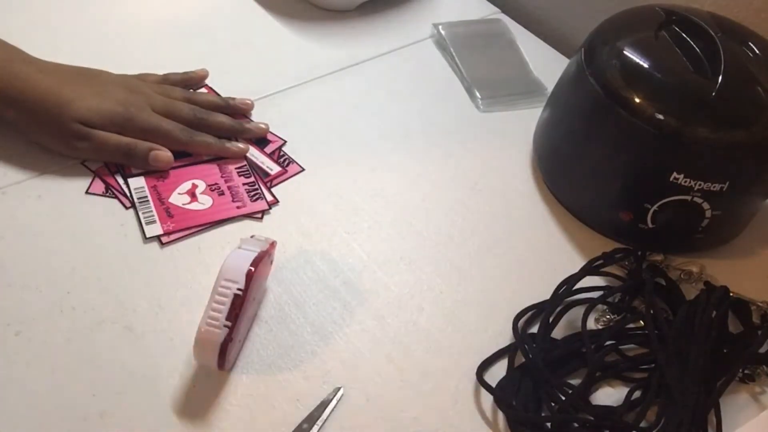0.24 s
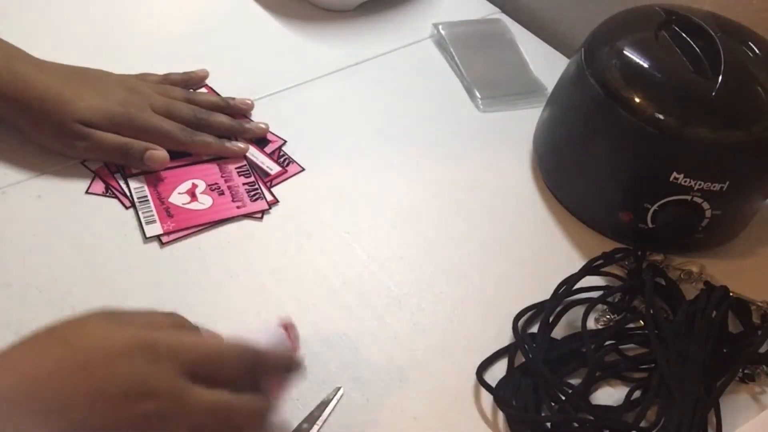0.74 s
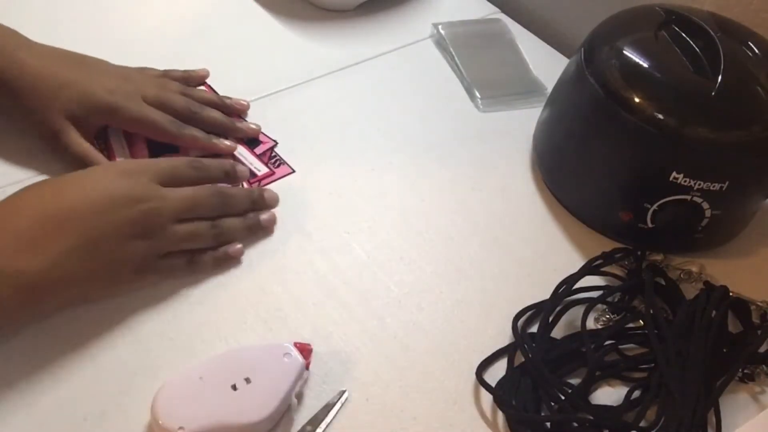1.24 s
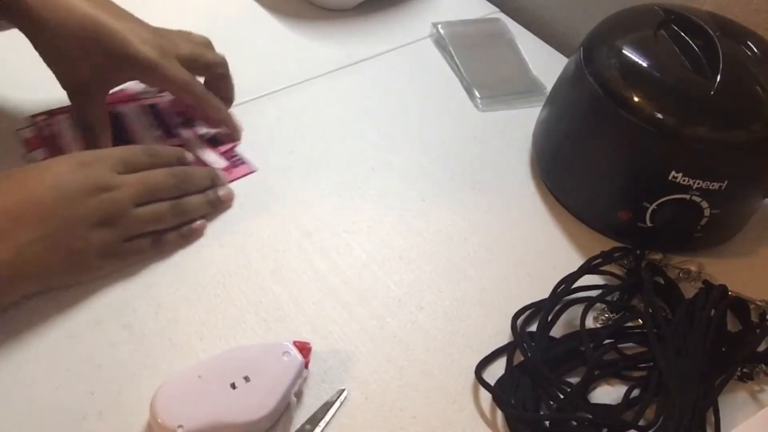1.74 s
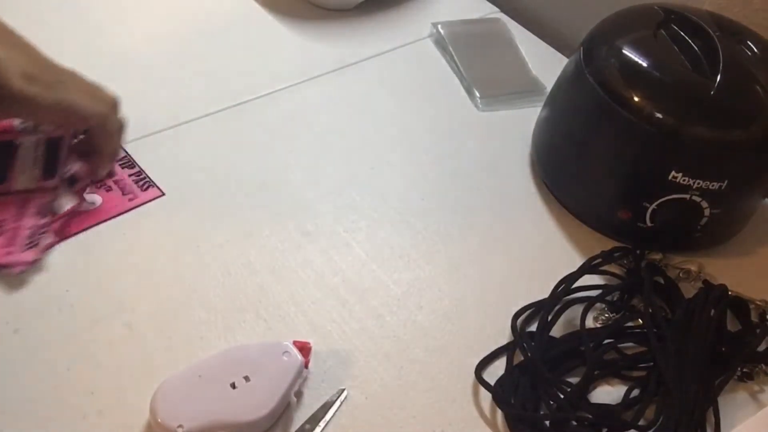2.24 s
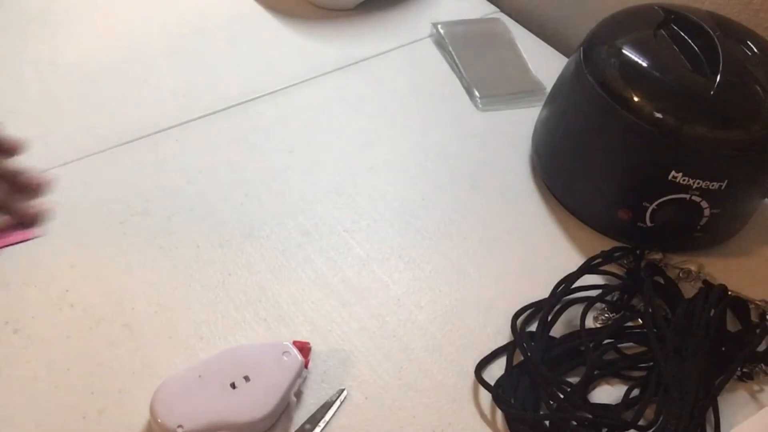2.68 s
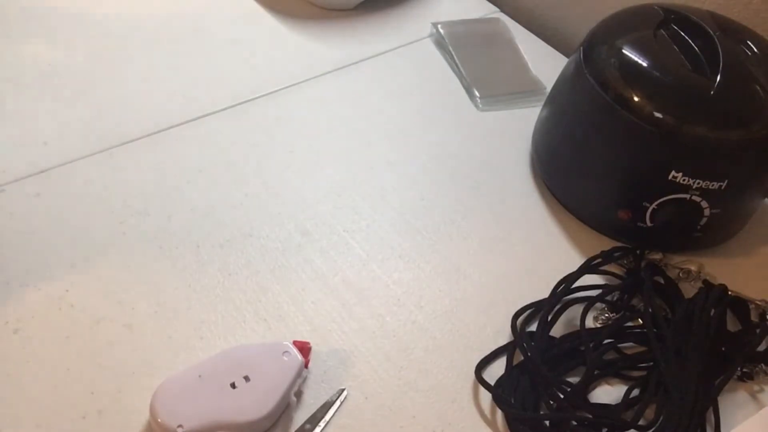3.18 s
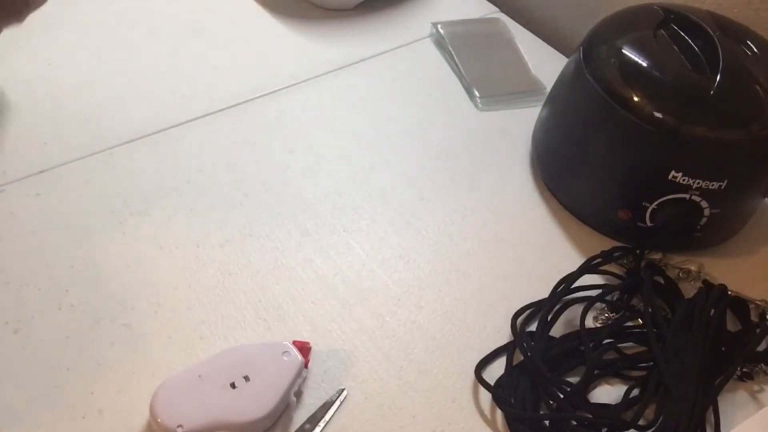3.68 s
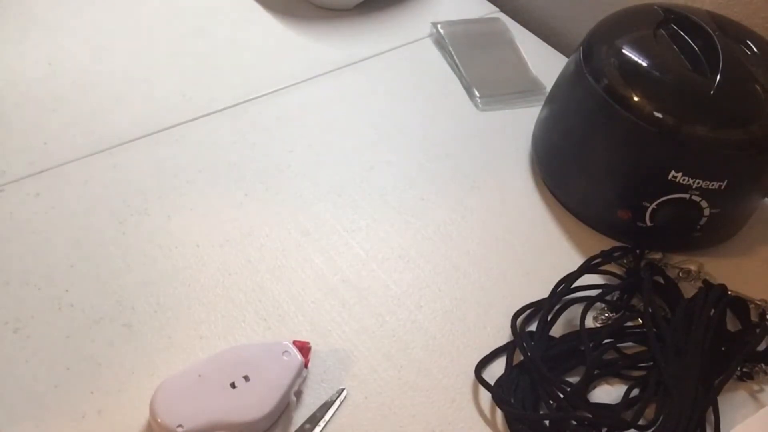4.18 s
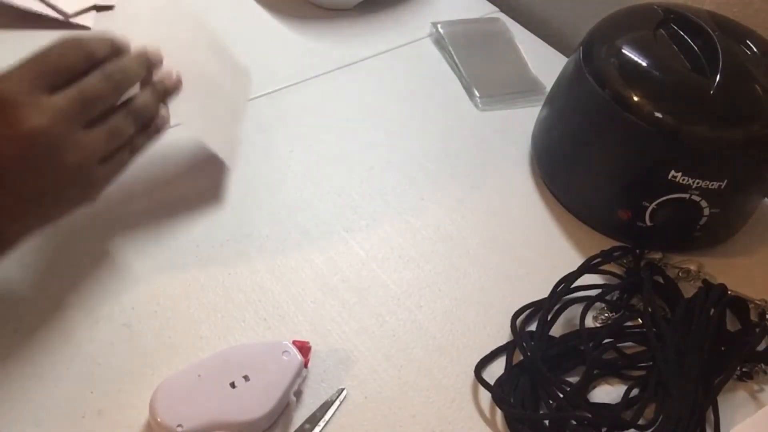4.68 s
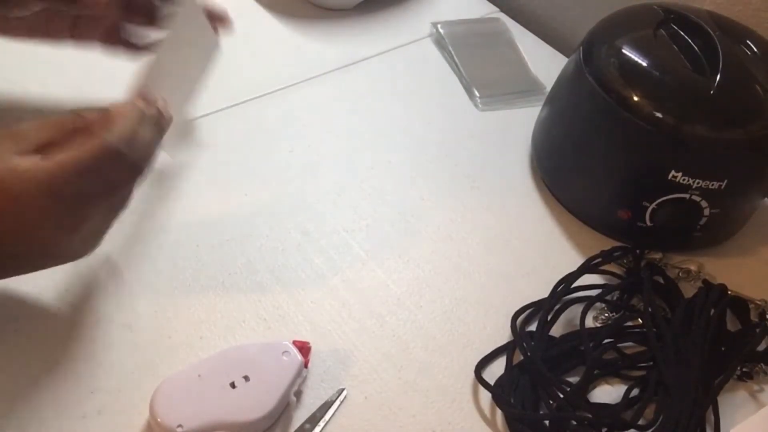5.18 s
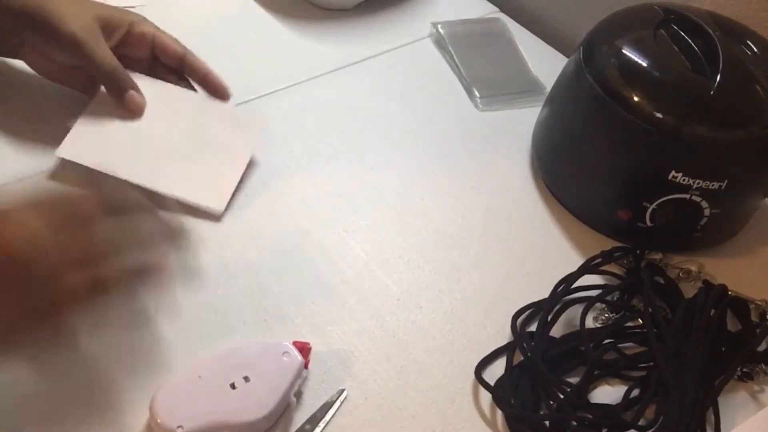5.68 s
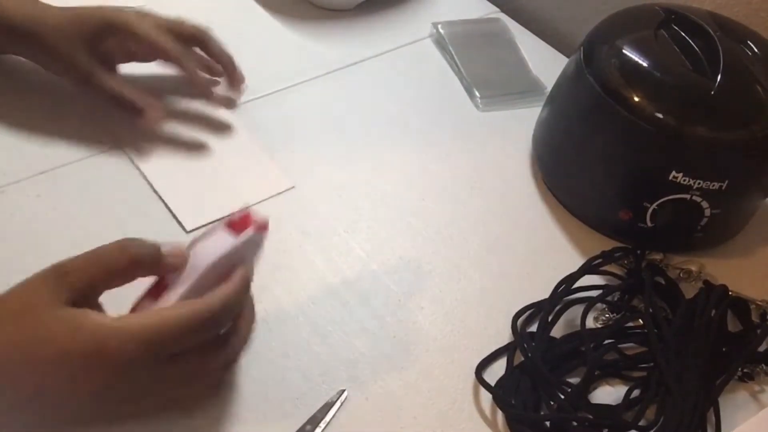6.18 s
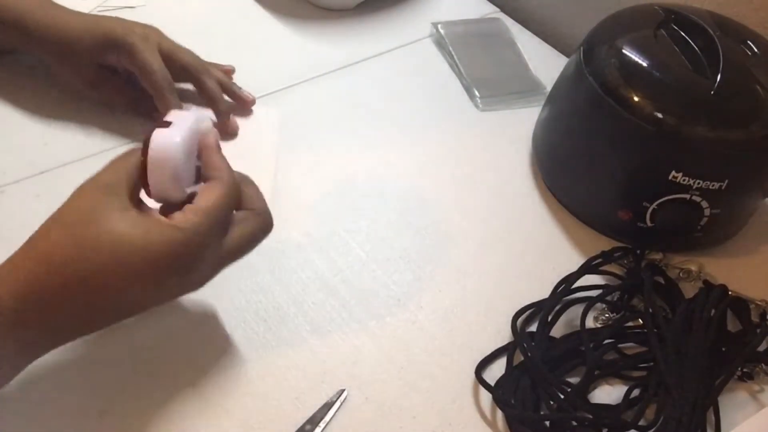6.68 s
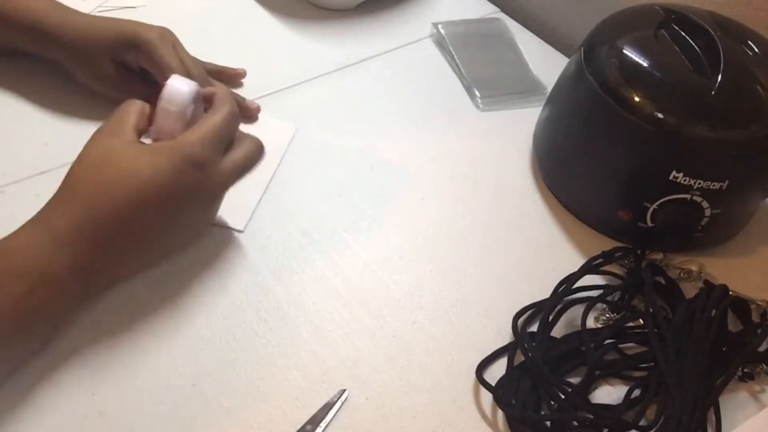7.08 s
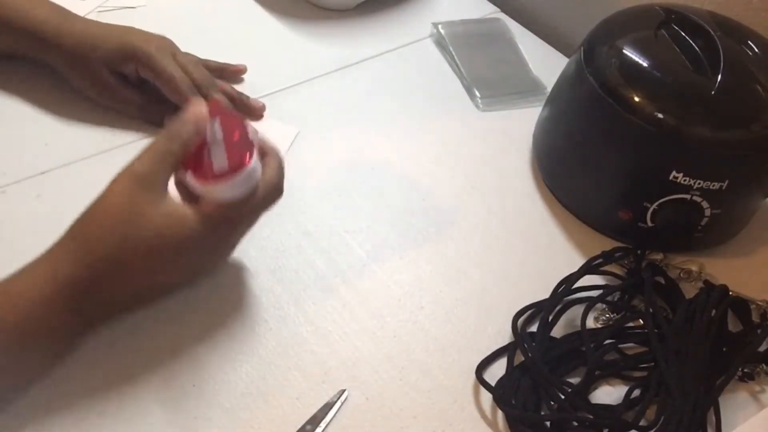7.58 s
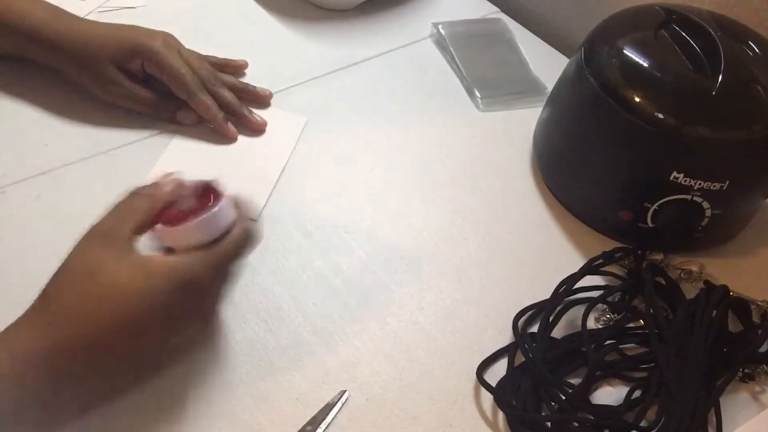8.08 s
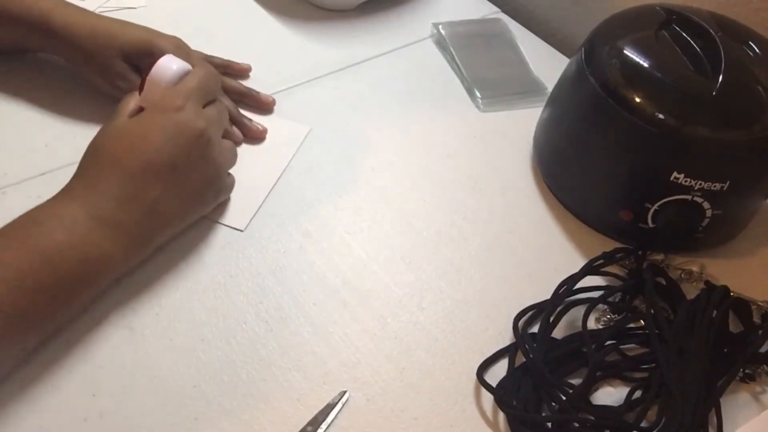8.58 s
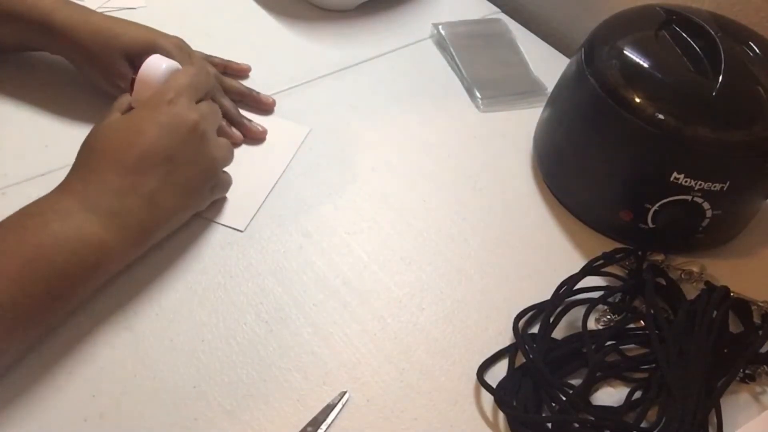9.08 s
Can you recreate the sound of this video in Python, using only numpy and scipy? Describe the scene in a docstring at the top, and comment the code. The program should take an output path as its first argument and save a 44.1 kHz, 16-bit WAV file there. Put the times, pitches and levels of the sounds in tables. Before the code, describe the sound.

Close to the microphone in a small quiet room, a hard plastic tape dispenser clacks loudly on a table and rattles to rest. A stack of cards is shuffled and swept away with papery rustles and small taps. After a sparse lull, a single card slides briskly, the dispenser is handled and set down softly, the card is wiped, and tape releases in tiny ticks that thicken into a rasp. A steady low hum lies beneath.

```python
"""Tape runner and cards on a table

A plastic tape runner is knocked over and rattles to rest; cards are swept away; a card slides and is wiped;
the runner is pressed down and its adhesive tape lets go in ticks that crowd into a rasp. An appliance hums.
Impacts and ticks are noise bursts through resonances; slides are rough friction noise through the same
kind of bodies, with room reverberation; squeaks, thumps and hum are sines; air is shaped noise.
"""
import sys
import numpy as np
from scipy import signal
from scipy.fft import rfft, irfft, next_fast_len
from scipy.io import wavfile
from scipy.ndimage import uniform_filter1d, map_coordinates

SR = 44100
rng = np.random.default_rng(int(sys.argv[2]) if len(sys.argv) > 2 else 0)


def dump(signal):
    """Clip the signal to [-1, 1] and save it as 16-bit WAV at the path in sys.argv[1]."""
    limited = np.clip(np.atleast_2d(signal).T, -1, 1)
    pcm = np.round(limited * 32767).astype(np.int16)
    wavfile.write(sys.argv[1], SR, pcm)


N = 411894

# table top resonances: center_hz, width_hz, gain_db
TABLE_MODES = [(240, 38, -3), (331, 39, 4), (378, 71, 2), (451, 120, -1), (595, 140, -4.5), (935, 260, -6),
               (191, 84, -7)]
# treble response of a hard or fine contact: freq_hz, gain_db
CONTACT_HISS = [(3000, -31), (6000, -3.5), (8000, -9.5), (11000, -13), (16000, -14)]
# spool resonances: center_hz, width_hz, gain_db
SPOOL_MODES = [(1160, 350, 2.5), (2010, 160, -20), (2540, 180, -8), (3270, 550, 0), (4100, 480, 0),
               (5700, 670, -2), (6300, 1200, -10)]
# adhesive releases: start_s, low_ring_peak_db, low_ring_hz, high_rings_re_low_db, film_re_low_db
TAPE_TICKS = [(8.355, -55, 1280, -8, -14), (8.39, -56, 1280, -6, -12), (8.429, -51, 1280, -6, -10),
              (8.467, -49, 1250, -4, -9), (8.492, -50.5, 1650, -1, -13), (8.499, -48, 1280, -5, -14),
              (8.545, -63, 980, 0, 5), (8.581, -51, 1340, 0, -6), (8.616, -47, 1240, -11, -17),
              (8.682, -46.5, 1250, -3, -10), (8.791, -49.5, 1950, -9, -18), (8.835, -48.5, 1240, -5, -8),
              (8.93, -51, 1260, -2, -12), (8.957, -48, 1190, -8, -15), (8.968, -45, 2080, -2.5, -6),
              (8.98, -44, 1320, -3, -8), (8.999, -41, 1900, -10, -13), (9.022, -41, 1910, -11, -13),
              (9.035, -44, 1890, -4, -4), (9.045, -34, 1840, -8, -5.5), (9.11, -44, 1850, -1, -18),
              (9.126, -43, 1890, -5, -16), (9.145, -47, 1300, 6, -16), (9.168, -33.5, 2000, 2, -7),
              (9.2, -39.5, 2110, -7, -16), (9.217, -45, 1830, -3, -11), (9.231, -40, 2160, 2, -11),
              (9.24, -43, 1940, 2, -9), (9.248, -36.5, 1860, 1, -9), (9.256, -41.5, 1810, 5, -9),
              (9.27, -49, 1830, 13, 3), (9.283, -48, 1277, 12, 0), (9.299, -47, 1270, 14, 4),
              (9.311, -45, 1290, 10, -2), (9.324, -47, 1900, 8, 4)]


def taps():
    """Each tap rings the shell, strongest at two tones set by the struck spot, and the table; an edge cracks."""
    # shell resonances: center_hz, width_hz, gain_db
    shell_modes = [(1017, 67, -12), (1235, 480, 0), (1410, 230, 9.5), (1510, 16, -9), (1610, 400, 2.5),
                   (2230, 1400, -8.5), (2450, 150, -10), (2840, 120, -5.5), (3540, 1000, 2.5),
                   (4000, 210, -47), (5470, 900, -7)]
    # knocks: start_s, shell_peak_db, low_ring_hz, high_ring_hz, low_ring_gain_db, high_ring_gain_db,
    # table_re_shell_db, edge_re_shell_db, shell_tail_db
    tap_rows = [(0.229, -28.5, 1700, 4370, 15, 24, -21, -19, -15),
                (0.254, -28, 1750, 6040, 4, 15, -28, -24, -19),
                (0.263, -32, 1770, 4300, 17, 23, -31, -24, -16),
                (0.325, -38, 1170, 4600, 9, 26, -21, -27, -18),
                (0.443, -44.5, 1410, 3130, 7, 21, -6, -27, 3),
                (0.479, -33, 1420, 2170, 10, -6, -4, -22, -15),
                (0.497, -42, 1540, 2950, 4, 4, -7, -27, -22),
                (0.641, -37.5, 1220, 2440, -1, -2, -25, -26.5, -6),
                (0.716, -5.5, 1410, 2440, 5.5, 4, -12.5, -27, -19),
                (0.72, -16, 1530, 3230, -6, 6, -20, -27, -16),
                (0.726, -25, 1570, 1970, 9, -6, -13, -26.5, -9),
                (0.733, -15.5, 1410, 2120, -8, -16, -14, -26.5, -15),
                (0.851, -23.5, 1130, 1900, 12, 6, 2.5, -25.5, -15),
                (0.867, -35.5, 1120, 1940, 14, -3, -20, -26, -4),
                (0.939, -31, 1400, 2300, 18, 10, 3, -27, -15),
                (0.988, -30, 1110, 1960, 6, 5, -3.5, -21, -23),
                (1.087, -49.5, 1640, 2050, 9, 4, -15, -27, 1), (1.193, -48.5, 956, 2370, 9, 2, 0, -27, -17),
                (1.358, -31, 880, 2030, 13.5, 5.5, 0.5, -33, -6),
                (1.517, -45, 1560, 2180, 2, -2, -5, -27.5, -8),
                (1.592, -38.5, 1020, 2120, 1, 17, -12, -27, -6),
                (1.64, -28, 1220, 3100, 9, 7.5, -3, -27, -7.5),
                (1.798, -30, 1560, 2830, -5, 4, -23, -26.5, -3),
                (2.088, -39.5, 790, 2110, 9, 2, 0, -27, -6),
                (2.135, -43.5, 1130, 2110, 16, 2, -13, -26.5, -4),
                (2.45, -35.5, 1070, 3020, 12, 23, -8.5, -25, -4),
                (2.732, -36.5, 1140, 1960, 14, -4, -3, -27, -9),
                (2.953, -32.5, 1500, 2560, 5, 8, -8.5, -28, -16),
                (3.095, -43, 960, 2070, 18, -9, -17, -27, -13),
                (3.237, -47, 1460, 2650, 7, 6, -16, -27, -22),
                (3.242, -33, 1330, 3820, 5.5, 15, -17, -24.5, -22),
                (3.451, -46.5, 1420, 2900, 10, 6, -12.5, -27.5, -16),
                (4.194, -27, 1200, 1990, 11, 4, -18, -27, -12),
                (4.518, -49, 1230, 4560, 9, 2, -8, -28, -11),
                (4.602, -47.5, 1010, 2250, 7, 5, -12, -27, -14),
                (5.273, -47, 888, 2460, 9.5, 5.5, 9.5, -27, -13),
                (5.462, -34, 1620, 2880, 9, 2, -16, -26.5, -10),
                (5.765, -36, 920, 3070, 4, 2, -2.5, -27.5, -12),
                (5.808, -48, 1220, 2410, 9, 11, -16, -27.5, -11),
                (5.893, -44, 1690, 3240, 9, -5, -10, -27, -10),
                (5.906, -38, 1330, 2430, 16, -9, -10, -29, -15),
                (6.079, -41.5, 1330, 2810, 9, -4, -2, -27, -2),
                (6.222, -46.5, 904, 2000, 19, -5.5, 9, -27, -11),
                (6.402, -51, 1620, 2620, 12, 0, -12, -25.5, -12.5),
                (7.044, -47, 1120, 1920, 12, -0.5, -12, -27, -12.5),
                (7.196, -45, 912, 2060, 8, 7, -16, -26, -19),
                (7.654, -39.5, 1850, 3170, 15.5, 11, -15, -27.5, -16),
                (7.867, -46, 880, 3150, 9, 4, -3, -27, -18), (8.021, -30, 880, 3450, 12, 4, -2, -27, -13)]
    t60_s, rise_s = 0.012, 0.0005
    track = np.zeros(N + SR)
    for start_s, db, low_hz, high_hz, low_db, high_db, table_db, edge_db, tail_db in tap_rows:
        spot = modes([(low_hz, 0.17 * low_hz, low_db), (high_hz, 0.22 * high_hz, high_db)])
        # a yielding contact cannot drive the top
        soft = lambda hz: 1 / (1 + 1j * hz / (1.59 * high_hz)) ** 2
        shell_response = lambda hz: (modes(shell_modes)(hz) + spot(hz)) * soft(hz)
        table_response = lambda hz: modes(TABLE_MODES)(hz) * soft(hz)
        shell = burst(t60_s, shell_response, rise_s, tail_db, tail_t60_s=0.16)
        table = burst(2.6 * t60_s, table_response, rise_s, tail_db=-11.0, tail_t60_s=0.23)
        crack = burst(0.87 * t60_s, hiss_response, rise_s, tail_db=-9, tail_t60_s=0.12)
        add(track, start_s, amp(db) * (shell + amp(table_db) * table + amp(edge_db) * crack))
    return track[:N]


def ticks():
    """Each adhesive release snaps the spool housing at a low tone and two high rings, and the film."""
    # tape film resonances: center_hz, width_hz, gain_db
    film_modes = [(6300, 1300, 12), (11060, 4000, -2.5)]
    # high rings of the spool housing, response squared below: center_hz, width_hz, gain_db
    housing_modes = [(3450, 520, 1), (4250, 860, -1.5)]
    t60_s = 0.011
    track = np.zeros(N + SR)
    for start_s, db, low_hz, high_db, film_db in TAPE_TICKS:
        low_response = lambda hz: modes([(low_hz, 0.28 * low_hz, 0)])(hz) ** 2
        high_response = lambda hz: modes(housing_modes)(hz) ** 2
        low = burst(t60_s, low_response, 0.00012, tail_db=-21, tail_t60_s=0.09)
        high = burst(t60_s, high_response, 0.00028, tail_db=-15, tail_t60_s=0.05)
        snap = burst(0.0045, modes(SPOOL_MODES), 0.0001, tail_db=-27.5, tail_t60_s=0.05)
        film = burst(t60_s, modes(film_modes), 0.00029, tail_db=-11, tail_t60_s=0.13)
        tick = low + amp(high_db) * high + amp(film_db) * film + amp(-3.5) * snap
        add(track, start_s, amp(db) * tick)
    return track[:N]


def thumps():
    """Dull blows of a hand or the shell into the table: a low sine swells over about a cycle and decays."""
    # blows: start_s, level_db (before decay and a 1 dB lift), pitch_hz, t60_s
    thump_rows = [(0.447, -19.5, 97, 0.13), (0.723, -20, 110.2, 0.11), (0.869, -20, 106, 0.072),
                  (1.811, -27.5, 284.5, 0.26), (2.46, -27, 74.5, 0.23)]
    track, t = np.zeros(N + SR), np.arange(SR // 3) / SR
    for start_s, db, hz, t60_s in thump_rows:
        decay = amp(db + 1 - 60 * t / t60_s)
        onset = (1 - np.exp(-t * hz * 1.5)) ** 2
        add(track, start_s, decay * onset * np.sin(2 * np.pi * hz * t))
    return track[:N]


def slides():
    """Cards are swept off, one slides, the runner is lifted, the card wiped, the runner seated and drawn."""
    # bodies a slide excites: center_hz, width_hz, gain_db
    stack_modes, card_modes, edge_modes = [(1460, 670, -2), (2410, 930, 3), (3110, 1540, 1),
                                           (4450, 1100, -2), (6020, 2100, -16)], [(612, 20, 3), (940, 340, -10.5),
                                                          (1650, 550, -5.5), (2440, 106, 2.5),
                                                          (2830, 74, 5), (3320, 160, 0), (3730, 300, -3),
                                                          (4500, 460, -3), (5270, 280, -6.5),
                                                          (6860, 290, -9)], [(1220, 250, -2), (1700, 440, -3.5),
                                                                        (2305, 460, -4), (3180, 255, 3.5),
                                                                        (4260, 760, -6.5), (5600, 380, -5)]
    rim_modes, nose_modes = [(1460, 450, 5), (2080, 350, 6.5), (2780, 1100, 3), (4290, 810, 2.5),
                             (5460, 880, -6)], [(2180, 250, -3), (2600, 310, -3), (4160, 350, -7.5),
                                          (5050, 570, -14)]
    # strokes: full_s, rise_s, hold_s, fall_s, scrape_db, table_drone_db, fine_hiss_db
    sweep_strokes, card_strokes, lift_strokes = [(.01, 0.012, 0.053, 0.6, -66, -68.5, -84),
                                                 (.475, .04, 0.018, .06, -56.5, -60.5, -74.5),
                                                 (.6, .2, .08, 0.046, -75, -72, -87),
                                                 (.705, .005, .01, 0.21, -49, -51, -74),
                                                 (.84, 0.06, 0.026, 0.054, -51, -44.5, -75.5),
                                                 (.935, .03, .015, .08, -57.5, -48.5, -78),
                                                 (1.05, .15, 0.29, 1, -65, -63.5, -82),
                                                 (1.6, 0.14, 0.02, .05, -52, -54, -74),
                                                 (1.67, .06, 0.13, 0.038, -53, -47.5, -69.5),
                                                 (1.826, 0.055, 0.012, 0.23, -41, -35.5, -68),
                                                 (2.0, 0.17, 0.15, 0.56, -58, -57.5, -70.5),
                                                 (2.368, .025, 0.017, 0.032, -56.5, -80, -60.5),
                                                 (2.495, 0.048, 0.24, 0.098, -48, -53.5, -60.5),
                                                 (2.86, 0.017, 0.14, 0.051, -57.5, -61, -72),
                                                 (3.016, .01, .008, .04, -51, -57, -60),
                                                 (3.045, .03, 0.018, .05, -54, -63, -58.5),
                                                 (3.095, 0.021, 0.039, .02, -50.5, -57, -62.5),
                                                 (3.24, 0.0104, 0.0037, 0.024, -42, -52.5, -64.5),
                                                 (3.345, 0.079, 0.0065, 0.084, -61.5, -68.5, -61),
                                                 (3.458, 0.062, 0.0087, 0.16, -60, -62.5, -72.5),
                                                 (3.65, 0.11, 0.014, 0.1, -55.5, -67, -61.5),
                                                 (3.78, 0.11, 0.02, 0.039, -60, -72, -60),
                                                 (3.95, 0.19, 0.042, 0.032, -60, -72, -65.5),
                                                 (4.066, 0.077, .005, .03, -57.5, -67, -63.5),
                                                 (4.12, 0.046, 0.084, 0.22, -59.5, -73, -62),
                                                 (4.198, 0.0068, .005, 0.048, -55, -41.5, -82),
                                                 (4.3, .08, 0.21, .05, -67, -72, -78.5),
                                                 (4.518, 0.0087, .005, 0.27, -56.5, -56.5, -68),
                                                 (4.738, 0.14, 0.0046, 0.03, -53, -63, -62),
                                                 (5.014, 0.03, 0.19, .06, -65, -72, -74.5)], [(5.38, 0.15, 0.072, 0.034, -43.5, -64, -55.5),
                                                                (5.474, 0.077, 0.026, 0.09, -35.5, -43.5, -49.5),
                                                                (5.66, 0.042, 0.044, .08, -69, -79, -79),
                                                                (5.79, 0.037, 0.044, 0.11, -73, -63, -79),
                                                                (5.91, 0.21, .01, 0.1, -58, -68, -71)], [(5.962, .04, 0.12, .05, -57.5, -65.5, -70.5),
                                                                               (6.092, 0.031, 0.0072, 0.053, -49.5, -44.5, -88),
                                                                               (6.342, 0.12, .03, .1, -73.5, -67, -85),
                                                                               (6.45, 0.15, 0.22, .15, -61, -66, -73),
                                                                               (7.028, 0.25, 0.043, .12, -64, -71, -80),
                                                                               (7.198, 0.027, 0.0042, .01, -77.5, -64, -80),
                                                                               (7.324, .065, .01, .08, -64.5, -68, -81),
                                                                               (7.436, .05, .005, .04, -66.5, -67, -90.5)]
    wipe_strokes, seat_strokes, peel_strokes = [(7.66, 0.14, 0.069, 0.034, -47.5, -57, -59),
                                                (7.87, 0.15, 0.025, 0.14, -45.5, -49, -56.5),
                                                (8.012, 0.03, 0.061, 0.063, -49.5, -53, -61.5)], [(8.35, 0.022, 0.041, 0.084, -55.5, -84.5, -88),
                                                              (8.468, 0.0084, 0.0044, 0.011, -62, -75, -82.5)], [(9.018, .07, .12, .1, -54.5, -70, -76.5),
                                                                            (9.2, 0.094, .06, 0.11, -53.5, -72, -65.5),
                                                                            (9.33, 0.2, .02, .05, -57, -65, -50)]
    swept = slide(sweep_strokes, stack_modes, clump_db=1.64, catch_db=0.72)
    card = slide(card_strokes, card_modes, clump_db=1.0, catch_db=0.0)
    lifted = slide(lift_strokes, rim_modes, clump_db=2.5, catch_db=-0.5)
    seated = slide(seat_strokes, nose_modes, clump_db=0.0, catch_db=2.5)
    tape = slide(peel_strokes, SPOOL_MODES, clump_db=2.0, catch_db=1.1, grip=jerks())
    wiped = slide(wipe_strokes, edge_modes, clump_db=1.0, catch_db=-1.45)
    return swept + card + lifted + seated + wiped + tape


def slide(strokes, body, clump_db, catch_db, grip=1):
    """One friction force rings the sliding thing, the table and the air at the contact."""
    gains = sum(np.outer(amp(row[4:]), swell(*row[:4])) for row in strokes)
    scrape_gain, drone_gain, hiss_gain = map(smooth, gains)
    force = grit(clump_db, catch_db)
    scrape = scrape_gain * unit(filtered(force, modes(body)))
    drone = drone_gain * unit(filtered(force, modes(TABLE_MODES)))
    hiss = hiss_gain * unit(filtered(force, hiss_response))
    return grip * (scrape + drone + hiss)


def grit(clump_db, catch_db):
    """Friction force: noise with patchy shifting colour, random clumps and sparse catches (dips if negative)."""
    patchy_db = 2
    z = signal.stft(rng.standard_normal(N), nperseg=256)[2]
    patches = uniform_filter1d(rng.standard_normal(z.shape), size=4, axis=0)
    patches = uniform_filter1d(patches, size=9, axis=1)
    noise = np.resize(signal.istft(z * amp(patchy_db * unit(patches)), nperseg=256)[1], N)
    catches = amp(catch_db * rng.exponential(size=N // 40)).repeat(40)  # steps of 40 samples
    return unit(noise * amp(clump_db * wobble(60)) * np.resize(catches, N))


def jerks(steady=0.42, slip_s=0.0062):
    """Tape runs out in a short rush after each release and only creeps between; gain is 0 before 8.8 s."""
    t = np.arange(N)[:, None][round(8.8 * SR):] / SR
    since_s = t - np.transpose(TAPE_TICKS)[0]
    rush = np.where(since_s > 0, np.exp(-np.abs(since_s) / slip_s), 0).max(axis=1)
    return np.pad(steady + 2.0 * rush, (N - len(rush), 0))


def squeaks():
    """Thin airy tones where an edge drags: a sine on a gliding pitch, fluttered by fast chance."""
    # squeaks: full_s, rise_s, hold_s, fall_s, pitch_hz (at full_s), glide_hz_per_s, level_db (rms before flutter)
    squeak_rows = [(.84, .015, .035, .015, 3150, 6, -50.5), (1.33, 0.06, .015, 0.061, 3220, 603, -60),
                   (2.83, 0.027, 0.027, .02, 1480, 2000, -64), (3.5, .035, 0.12, .22, 1123, 902, -67),
                   (5.968, .03, .1, 0.31, 2100, -300, -62)]
    t = np.arange(N) / SR
    total = np.zeros(N)
    for full_s, rise_s, hold_s, fall_s, hz, glide, db in squeak_rows:
        gain = amp(db) * np.sqrt(2) * smooth(swell(full_s, rise_s, hold_s, fall_s))
        flutter = 0.65 + 0.83 * wobble(300)
        cycles = (hz + glide * (t - full_s) / 2) * (t - full_s)
        total += gain * flutter * np.sin(2 * np.pi * cycles)
    return total


def room(x):
    """Reverberation by a noise tail; each frequency dies at its own speed."""
    # room decay: freq_hz, t60_s
    room_t60 = [(200, 0.22), (1500, 0.27), (5000, 0.35), (14000, 0.19)]
    hz, t, z = signal.stft(rng.standard_normal(SR // 2), SR, nperseg=256)
    decay = amp(-60 * t / along(room_t60, hz)[:, None])
    tail = signal.istft(z * decay, SR, nperseg=256)[1]
    return signal.fftconvolve(np.pad(x, (200, 0)), tail / np.linalg.norm(tail))[:N]  # 200-sample delay


def background():
    """Wavering appliance tones over broad room and appliance noise."""
    # appliance tones: pitch_hz, level_db (rms before wavering), waver_db
    hum_tones = [(58.8, -62, 4), (119.9, -39.5, 0.45), (232.6, -70, 1), (472, -68, 0.7)]
    # noise spectrum before scaling to -48.5 dB rms: freq_hz, gain_db
    air_spectrum = [(12, -30), (30, -11), (60, 0), (90, -3), (125, -4), (150, -16.5), (190, -24),
                    (260, -20.5), (450, -27.5), (620, -33.5), (1500, -38), (3500, -45), (7000, -50),
                    (9000, -57.5), (16000, -59)]
    t = np.arange(N) / SR
    tones = np.zeros(N)
    for hz, db, waver_db in hum_tones:
        tones += np.sqrt(2) * amp(db + waver_db * wobble(3.6)) * np.sin(2 * np.pi * hz * t)
    air = filtered(rng.standard_normal(N), lambda hz: amp(along(air_spectrum, hz)))
    return tones + amp(-48.5) * unit(air)


def burst(t60_s, response, rise_s, tail_db, tail_t60_s):
    """A sharp blow and dying noise through a body, peak 1; the walls return a second, longer tail."""
    blow_db = 11.5  # one-sample contact, over the noise
    t = np.arange(SR // 3) / SR
    decay = amp(-60 * t / t60_s) + amp(tail_db - 60 * t / tail_t60_s)
    shape = (1 - np.exp(-t / rise_s)) ** 2 * decay
    blow = amp(blow_db) * (np.arange(len(t)) == round(rise_s * SR))
    x = filtered(rng.standard_normal(len(t)) * shape + blow, response)
    return x / np.abs(x).max()


def modes(table):
    """Causal response of center_hz, width_hz, gain_db resonances, alternating in sign."""
    return lambda f: sum((-1) ** k * amp(db) * 1j * f * w / (c * c - f * f + 1j * f * w)
                         for k, (c, w, db) in enumerate(table))


def hiss_response(hz):
    """Treble gain of a hard or fine contact."""
    return amp(along(CONTACT_HISS, hz))


def swell(full_s, rise_s, hold_s, fall_s):
    """Gain of one gesture, a value per 44 samples: rises, holds, falls."""
    fade_db = 25  # below full level one rise before, or one fall after
    t = np.arange(N // 44 + 2) * 44 / SR - full_s
    away = np.maximum(-t / abs(rise_s), (t - abs(hold_s)) / abs(fall_s))
    return amp(-fade_db * np.maximum(0, away))


def smooth(x):
    """From a value per 44 samples to one per sample."""
    return np.interp(np.arange(N) / 44, np.arange(len(x)), x)


def wobble(rate_hz):
    """Smooth random curve, rate_hz knots a second."""
    knots = rng.standard_normal(int(N * rate_hz / SR) + 4)
    return map_coordinates(knots, [np.arange(N) * rate_hz / SR])


def filtered(x, response):
    """x through a complex response of frequency."""
    m = next_fast_len(len(x) + 8192)
    return irfft(rfft(x, m) * response(np.fft.rfftfreq(m, 1 / SR)), m)[:len(x)]


def along(points, hz):
    """Interpolates freq_hz, value points on a log axis."""
    f, v = np.transpose(points)
    return np.interp(np.log(hz + 1), np.log(f + 1), v)


def amp(db):
    """dB to gain."""
    return 10 ** (np.asarray(db) / 20)


def unit(x):
    """Scaled to rms 1."""
    return x / np.sqrt(np.mean(x ** 2) + 1e-20)


def add(track, start_s, x):
    """Mixes x into the track from start_s."""
    track[round(start_s * SR):][:len(x)] += x


def scene():
    """Near sounds, and the slides with their room, over the background."""
    rubs = slides()
    near = taps() + ticks() + thumps() + rubs + squeaks()
    return (near + amp(-10.5) * room(rubs) + background())[None]


def record(dry):
    """The microphone chain keeps nothing above its band limit."""
    top_hz = 15750
    return filtered(dry[0], lambda hz: hz < top_hz)[None]


dry = scene()
out = record(dry)
dump(out)
```